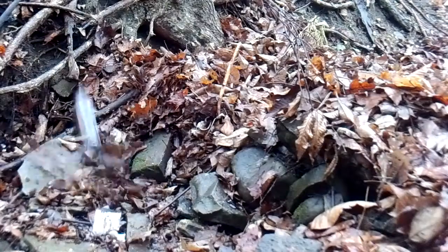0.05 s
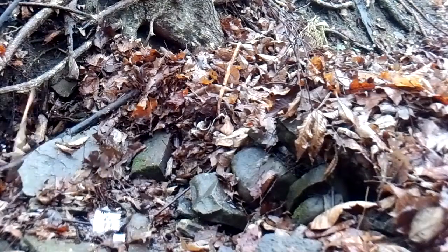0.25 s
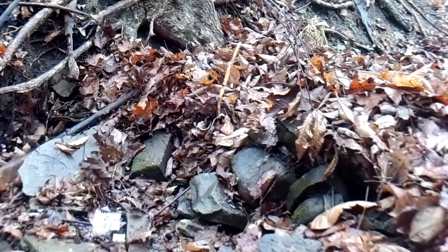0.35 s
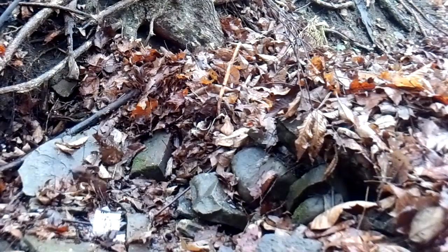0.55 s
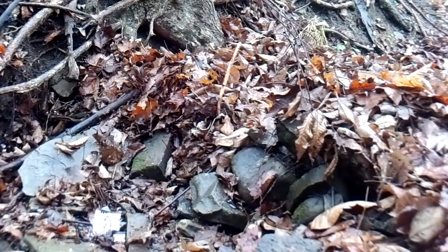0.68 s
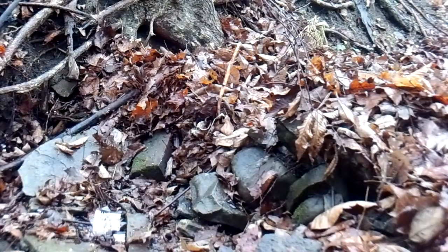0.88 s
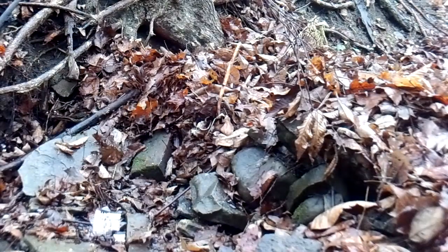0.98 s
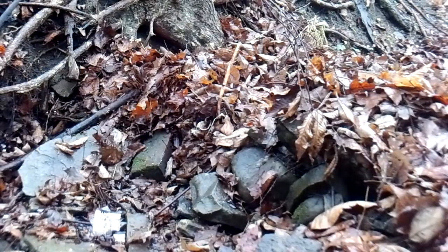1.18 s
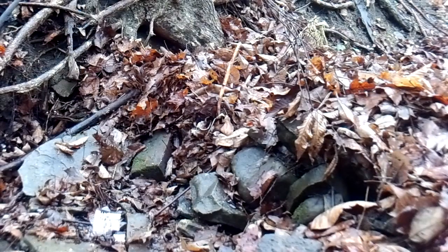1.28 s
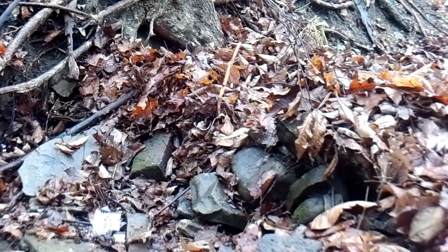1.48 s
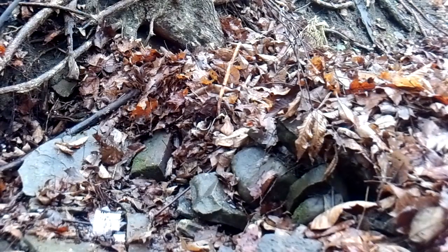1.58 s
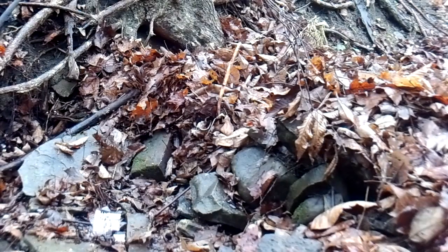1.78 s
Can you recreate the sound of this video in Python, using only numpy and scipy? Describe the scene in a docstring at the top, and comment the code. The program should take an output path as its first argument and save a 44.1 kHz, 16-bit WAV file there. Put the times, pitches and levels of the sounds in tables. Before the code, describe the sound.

Close up on a leafy forest floor, a glass bottle shatters against stone, briefly overloading the microphone. Fragments scatter and tinkle, followed by a short rustle of dry leaves and one ringing clink over faint outdoor hiss.

```python
"""Bottle smashed in the woods

A glass bottle breaks on rock on a leafy forest floor, close enough to overload the microphone.
Its wall rings, the air in its neck hums, and shards tinkle down among the stones.
Dry leaves rustle, then what is left of the bottle takes one more clink; the woods answer faintly."""
import sys
import numpy as np
from scipy import signal
from scipy.fft import rfft, irfft, next_fast_len
from scipy.io import wavfile
from scipy.ndimage import map_coordinates

SR = 44100
rng = np.random.default_rng(int(sys.argv[2]) if len(sys.argv) > 2 else 0)


def waveform_to_disk(signal):
    """Save audio, clipped to [-1, 1], as 16-bit WAV at the path in sys.argv[1]."""
    frames = np.transpose(np.atleast_2d(signal))
    scaled = np.clip(frames, -1, 1) * 32767
    samples = np.round(scaled).astype(np.int16)
    wavfile.write(sys.argv[1], SR, samples)


N = 81585

# spectrum of a dry hit on stone or twig: frequency_hz, level_db
TICK_COLOUR = [(100, -22.5), (700, -15), (1500, 2.5), (3000, -3.5), (4500, 12.5), (6200, -10),
               (9000, -14.5), (13000, -15.5), (15000, -32.5)]
SMASH_ROUGHNESS = .3


def bottle():
    """The glass wall rings in the same modes twice: roughly as it breaks, more cleanly in the clink."""
    # wall modes: pitch_hz, t60_s, smash_relative_db, clink_relative_db
    modes = [(1308, .21, -11, -17), (3445, .26, -14, -27), (3606, .175, 2, 1.5), (3645, .26, -3, -40),
             (3835, .28, -13, -36), (4260, .07, -11, -14), (4790, .125, -2, -18), (4858, .14, -9, -13),
             (5275, .24, 1, -18), (5577, .26, -15, -42), (6522, .18, -12, -60), (8160, .25, -21, -60),
             (8893, .12, -20, -39), (10720, .09, -20, -44)]
    smash_s, clink_s, beat_hz = .2295, 1.5525, 24.4
    smash = sum(ring(smash_s, hz, db, t60, rise_s=.004, wander=chatter(SMASH_ROUGHNESS))
                for hz, t60, db, _ in modes)
    beat = np.cos(np.pi * beat_hz * (since(clink_s) - .013))  # peaks 13 ms into the clink
    strongest_db = max(db for *_, db in modes)
    clink = sum(ring(clink_s, hz, db, t60, rise_s=.00059,
                     wander=beat if db == strongest_db else chatter(.18))
                for hz, t60, _, db in modes)
    return amp(-1.5) * smash + amp(-3.5) * clink


def fractures():
    """The glass gives way in a quick run of bright cracks."""
    # cracks: start_s, level_db, t60_s
    cracks = [(.2272, -20.5, 0.016), (.229, 7.5, 0.046), (.2355, 3, 0.064), (.2465, -7, 0.135)]
    # their spectrum: frequency_hz, level_db
    colour = [(30, -26.5), (200, -26.5), (600, -16.5), (2500, -3.5), (3600, 3.5), (4900, 18.5), (6200, 2.5),
              (9000, -0.5), (13500, -4), (15500, -23.5)]
    return bursts(cracks, colour)


def knocks():
    """Each hard contact with the rock gives a few cycles of a hollow note and a burst of grit."""
    # contacts: start_s, pitch_hz, level_db, t60_s, grit_db
    contacts = [(.231, 1330, 20, .008, -9), (.2419, 1520, 18, .008, -7), (1.552, 1100, 3, .005, -6),
                (1.583, 1100, -26, .02, -22)]
    # grit spectrum: frequency_hz, level_db
    colour = [(30, -26), (150, -14), (450, -5), (800, -6), (1600, 0), (2800, -7), (7000, -40)]
    grit_t60_s = .024
    notes = sum(ring(s, hz, db, t60, rise_s=.0015) for s, hz, db, t60, _ in contacts)
    return notes + bursts([(s, grit_db, grit_t60_s) for s, *_, grit_db in contacts], colour)


def large_piece():
    """A large curved piece breaks free and sings out, its close modes beating."""
    # mode cluster: pitch_hz, level_db
    modes = [(5222, -11), (5268, -5), (5318, 2), (5366, -8)]
    return sum(ring(.264, hz, db, t60_s=.2, rise_s=.008, wander=chatter(SMASH_ROUGHNESS))
               for hz, db in modes)


def shards():
    """Each shard ticks as it lands, then rattles with a main mode and a weaker one on either side."""
    # landings: start_s, pitch_hz, level_db, t60_s
    landings = [(0.384, 12930, -31.5, 0.083), (0.395, 8120, -32, 0.36), (0.419, 12540, -25.5, 0.041),
                (0.4372, 5590, -12.5, 0.091), (0.436, 9100, -32, 0.54), (0.448, 8240, -20.5, 0.14),
                (.448, 12150, -35, 0.13), (0.4585, 4597, -16, 0.2), (0.478, 7930, -16.5, 0.04),
                (.478, 10650, -25, 0.068), (0.51, 5570, -17, 0.085), (0.512, 6500, -28, 0.1),
                (.495, 13500, -43, 0.11), (0.5124, 4110, -19, 0.14), (0.518, 12440, -23.5, 0.039),
                (0.526, 9150, -22.5, 0.088), (0.526, 8560, -28, 0.082), (.527, 4030, -24, .09),
                (0.553, 12750, -34, 0.099), (0.584, 4570, -26, 0.037), (0.584, 11200, -41, 0.091),
                (0.619, 13300, -37, 0.036), (0.635, 12300, -38, 0.13), (.704, 11200, -41, 0.13),
                (.706, 12850, -40, 0.095), (0.7283, 12600, -34, 0.05), (.762, 12950, -35.5, 0.052),
                (0.774, 13100, -32, 0.04), (0.8482, 8310, -36.5, 0.12), (0.897, 2700, -36, 0.034),
                (1.153, 4320, -37, 0.025), (1.774, 4290, -29, 0.02), (1.816, 4120, -38, 0.022)]
    side_spread, side_db, tick_db, tick_t60_s = .09, -13, -11.5, .019
    offsets = side_spread * rng.random((len(landings), 2)) * [-1, 1]
    rings = np.zeros(N)
    for (s, hz, db, t60), (below, above) in zip(landings, offsets):
        for offset, mode_db in [(0, 0), (below, side_db), (above, side_db)]:
            rattle = chatter(.42, rate_hz=260)
            rings += ring(s, hz * (1 + offset), db + mode_db, t60, rise_s=.00044, wander=rattle)
    return rings + bursts([(s, db + tick_db, tick_t60_s) for s, _, db, _ in landings], TICK_COLOUR)


def splinters():
    """Fine glass patters on the leaves and shimmers where it meets stone."""
    # course of the spray: time_s, level_db
    spray = [(.22, -77), (.25, -14), (.31, -38), (.37, -34), (.425, -48), (.45, -36.5), (.5, -41.5),
             (.535, -32.5), (.6, -41), (.67, -47.5), (.78, -46), (.95, -59.5), (1.1, -69.5)]
    # spectra of patter and shimmer: frequency_hz, level_db
    patter_colour = [(100, -26), (600, -19), (1500, -3.5), (3200, -3), (4400, 8.5), (6200, -9),
                     (9000, -23.5), (13000, -19), (14500, -35)]
    shimmer_colour = [(5000, 3.5), (9000, 4), (10500, -3.5), (13000, 0)]
    shimmer = grains(per_s=750, q=250, spread_db=2.6, low_hz=5000, high_hz=14000)
    return level(spray) * (crackle(patter_colour) + amp(-7.5) * coloured(shimmer, shimmer_colour))


def ticks():
    """Small dry hits on stone and twig."""
    # hits: start_s, level_db, t60_s
    hits = [(.182, -17.5, 0.015), (.5109, -18, 0.015), (.7618, -30, .018), (.895, -38, 0.03),
            (.924, -37, .03), (1.5526, -8, .017)]
    return bursts(hits, TICK_COLOUR)


def leaves():
    """Each brush or bit of falling debris crackles in the dry leaves."""
    # rustles: start_s, level_db, rise_s, t60_s
    rustles = [(0.618, -35.5, .002, 0.086), (1.2, -20.5, 0.011, 0.13), (1.243, -34.5, 0.011, 0.38),
               (1.273, -37, 0.0013, 0.021), (1.315, -32.5, 0.021, 0.15)]
    # leaf spectrum: frequency_hz, level_db
    colour = [(30, -21.5), (600, -3.5), (1300, 0.5), (3000, 2), (4500, 11.5), (6000, -8), (9000, -16),
              (13000, -23.5), (15000, -40)]
    return crackle(colour) * sum(amp(db) * fade(s, rise, t60) for s, db, rise, t60 in rustles)


def thuds():
    """Dull bumps on the soil."""
    # bumps: start_s, level_db, t60_s
    bumps = [(.231, -33, 0.17), (1.208, -49.5, 0.4)]
    # soil spectrum: frequency_hz, level_db
    colour = [(25, 0), (70, 4), (150, -4), (400, -12), (1000, -26), (4000, -67)]
    return bursts(bumps, colour, rise_s=.012)


def neck():
    """Puffs from the jolted bottle set the air in its neck humming."""
    # puffs: start_s, level_db, t60_s
    puffs = [(.2295, -44, .8), (.44, -57, .7), (1.2, -44, .3), (1.5525, -38, .4)]
    pitch_hz = 208
    return sum(ring(s, pitch_hz, db, t60, rise_s=.005) for s, db, t60 in puffs)


def scuff():
    """A soft scuff leads into the smash."""
    # its swell: time_s, level_db
    swell = [(.03, -66), (.095, -51.5), (.113, -36), (.15, -42.5), (.23, -46), (.26, -75.5)]
    # its spectrum: frequency_hz, level_db
    colour = [(30, -4), (1070, -6), (3150, -20.5), (4520, -8), (14000, -72)]
    return level(swell) * noise(colour)


def woods(x):
    """Trunks and slope send a thin, diffuse echo back to the microphone."""
    # echo decay: frequency_hz, t60_s
    decay = [(100, .4), (1500, 0.3), (4500, 0.85), (13000, 0.13)]
    hz, t, spectrum = signal.stft(rng.standard_normal(SR), SR, nperseg=256)
    damping = np.exp(-np.log(1000) * t / along(decay, hz)[:, None])
    _, tail = signal.istft(spectrum * damping, SR, nperseg=256)
    return signal.fftconvolve(x, tail / np.linalg.norm(tail))[:N]


def forest_air():
    """Faint outdoor hiss with a steady drone far off."""
    # hiss spectrum: frequency_hz, level_db
    colour = [(25, 1), (100, -12.5), (380, -3.5), (520, -7.5), (770, -4), (950, -8.5), (1650, -4.5),
              (2400, -9), (3300, -12), (4400, -0.5), (5300, -13.5), (6500, -22), (13000, -24), (15000, -49)]
    # its slow drift: time_s, level_db
    drift = [(0, -50), (1.0, -53), (1.17, -50), (1.48, -53.5), (1.8, -51)]
    drone_hz = 772
    return level(drift) * noise(colour) + amp(-65) * np.sin(2 * np.pi * drone_hz * since(0))


def amp(db):
    """Decibels to gain."""
    return 10 ** (np.asarray(db) / 20)


def along(points, hz):
    """Interpolate (frequency_hz, value) points on a log axis."""
    f, v = np.transpose(points)
    return np.interp(np.log(hz + 1), np.log(f + 1), v)


def level(points):
    """Gain per sample from (time_s, level_db) points."""
    return amp(np.interp(since(0), *np.transpose(points)))


def filtered(x, response):
    """x through a frequency response."""
    size = next_fast_len(N + SR // 2)
    return irfft(rfft(x, size) * response(np.fft.rfftfreq(size, 1 / SR)), size)[:N]


def coloured(x, colour):
    """x with a spectral colour, at rms 1."""
    shaped = filtered(x, lambda hz: amp(along(colour, hz)))
    return shaped / np.sqrt(np.mean(shaped ** 2) + 1e-20)


def noise(colour):
    """Fresh coloured noise."""
    return coloured(rng.standard_normal(N), colour)


def since(start_s):
    """Seconds since the start, zero before."""
    return np.maximum(np.arange(N) / SR - start_s, 0)


def fade(start_s, rise_s, t60_s):
    """Quick rise, exponential decay."""
    t = since(start_s)
    return (1 - np.exp(-t / rise_s)) * np.exp(-np.log(1000) * t / t60_s)


def ring(start_s, hz, db, t60_s, rise_s, wander=1):
    """One damped mode; wander varies its strength and phase."""
    tone = np.imag(wander * np.exp(2j * np.pi * hz * since(start_s)))
    return amp(db) * fade(start_s, rise_s, t60_s) * tone


def chatter(depth, rate_hz=190):
    """Quick random change of strength and phase while glass rattles against the ground."""
    knots = rng.standard_normal((2, int(N * rate_hz / SR) + 4))
    real, imaginary = (map_coordinates(k, [since(0) * rate_hz], order=1) for k in knots)
    return (1 + depth * (real + 1j * imaginary)) / np.sqrt(1 + depth ** 2)


def bursts(hits, colour, rise_s=.0002):
    """Short noisy impacts of one colour, adding in power."""
    return noise(colour) * np.sqrt(sum((amp(db) * fade(s, rise_s, t60)) ** 2 for s, db, t60 in hits))


def grains(per_s, q, spread_db, low_hz, high_hz):
    """A steady shower of tiny damped rings of random pitch and strength."""
    start, pitch, chance = np.hsplit(rng.random((int(per_s * N / SR), 3)), 3)
    samples = np.arange(2400)
    hz = low_hz + (high_hz - low_hz) * pitch
    cycles = hz * samples / SR
    strength = amp(-spread_db * np.log(np.maximum(chance, .01))) * np.sqrt(hz)
    waves = strength * np.sin(2 * np.pi * cycles) * np.exp(-np.pi * cycles / q)
    positions = (start * N).astype(int) + samples
    return np.bincount(positions.ravel(), waves.ravel(), N)[:N]


def crackle(colour):
    """Dense tiny clicks of dry leaves."""
    return coloured(grains(per_s=3100, q=1, spread_db=.5, low_hz=470, high_hz=14500), colour)


def scene():
    """Glass and leaves close to the microphone, with the woods around them."""
    near = bottle() + large_piece() + neck()
    near += knocks() + fractures() + ticks() + thuds()
    near += shards() + splinters() + leaves()
    return (near + amp(-29) * woods(near) + forest_air() + scuff())[None]


def record(dry):
    """The close mono microphone clips on the loudest peaks and cuts off steeply at the very top."""
    ceiling, hardness, top_hz = .72, 16, 14600
    oversampled = signal.resample_poly(dry[0], 4, 1)
    clipped = oversampled / (1 + np.abs(oversampled / ceiling) ** hardness) ** (1 / hardness)
    mono = signal.resample_poly(clipped, 1, 4)
    return filtered(mono, lambda hz: 1 / np.sqrt(1 + (hz / top_hz) ** 56))[None]


dry = scene()
out = record(dry)
waveform_to_disk(out)
```